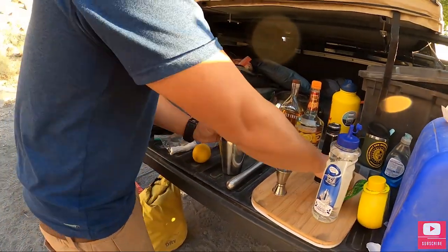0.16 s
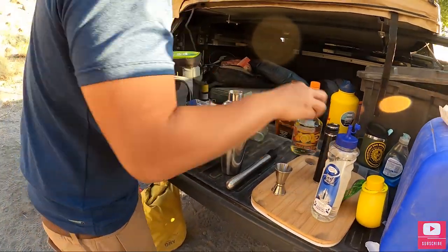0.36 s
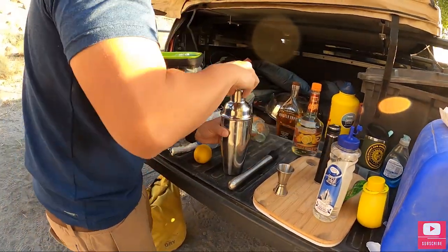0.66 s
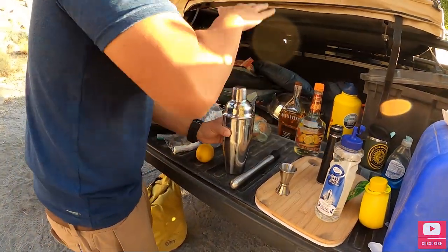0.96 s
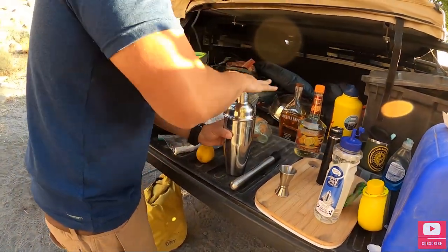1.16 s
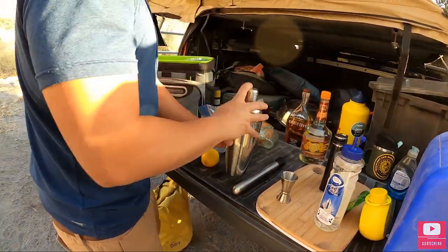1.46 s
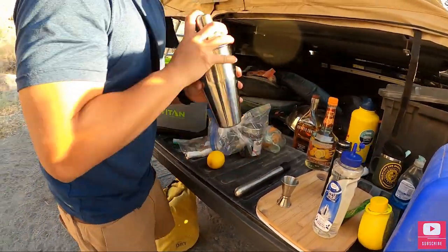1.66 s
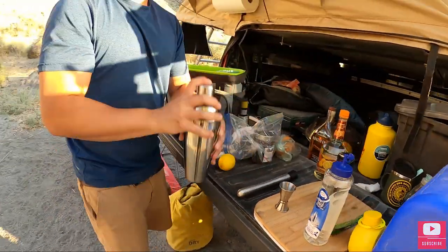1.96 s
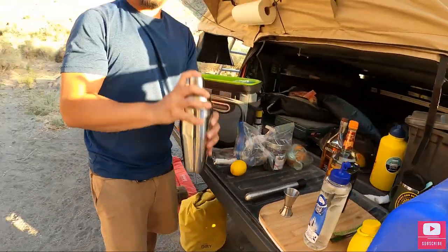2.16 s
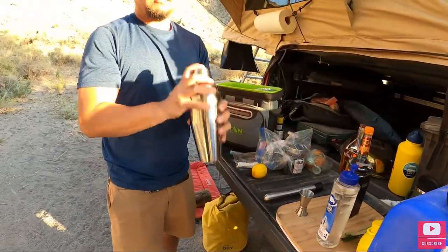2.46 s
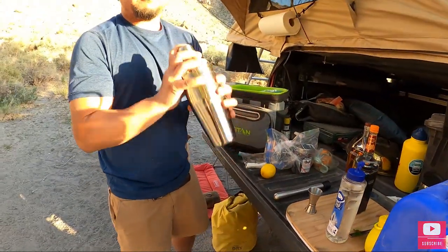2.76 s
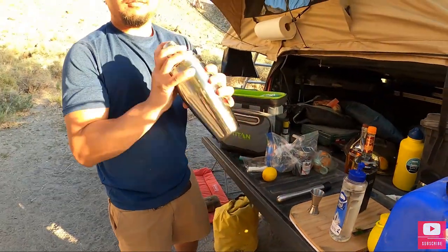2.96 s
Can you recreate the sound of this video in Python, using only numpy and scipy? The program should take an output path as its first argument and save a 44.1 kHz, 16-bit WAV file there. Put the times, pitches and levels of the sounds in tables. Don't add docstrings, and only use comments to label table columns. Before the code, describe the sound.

Steel shaker full of ice: cap clacks on, two palm slaps boom, then brisk rhythmic rattling

```python
import sys
import numpy as np
from scipy import signal
from scipy.fft import rfft, irfft
from scipy.io import wavfile

SR = 44100
rng = np.random.default_rng(int(sys.argv[2]) if len(sys.argv) > 2 else 0)


def ratio_of_db(decibels):
    return 10 ** (np.asarray(decibels, float) / 20)


def generate_wav(signal):
    frames = np.transpose(np.atleast_2d(signal))
    scaled = np.clip(frames, -1, 1) * 32767
    pcm = np.round(scaled).astype(np.int16)
    wavfile.write(sys.argv[1], SR, pcm)


N = 136710

# (frequency [Hz], level [dB], t60 [s])
TIN_MODES = [(760, -11.5, 0.014), (1070, -13.5, 0.0081), (1460, -3, 0.011), (1743, -2, 0.0053),
             (2250, -2, 0.0049), (2900, -1.5, 0.009), (3440, -8, 0.016), (4200, -9.5, 0.00435),
             (5730, -9.5, 0.0069)]


def noise():
    return rng.standard_normal(N)


def rms_one(x):
    return x / np.sqrt(np.mean(x ** 2) + 1e-20)


def band(x, low_hz, high_hz):
    return signal.sosfilt(signal.butter(2, [low_hz, high_hz], "band", fs=SR, output="sos"), x)


def through_tin(x):
    return band(x, 290, 6680)


def ring(clicks, hz, t60):
    radius = ratio_of_db(-60 / (max(t60, 0.002) * SR))
    angle = 2 * np.pi * hz / SR
    poles = [1, -2 * radius * np.cos(angle), radius * radius]
    return signal.lfilter([0, np.sin(angle)], poles, clicks + 1e-18)


def coloured(x, spectrum):
    hz, db = np.transpose(spectrum)
    size = 4096
    bins_hz = np.linspace(1, SR / 2, size // 2 + 1)
    log_gain = np.interp(np.log(bins_hz), np.log(hz), db) * np.log(10) / 20
    cepstrum = irfft(log_gain)
    cepstrum[1:size // 2] *= 2
    cepstrum[size // 2 + 1:] = 0
    response = irfft(np.exp(rfft(cepstrum)))
    return signal.fftconvolve(x, response / np.sqrt(np.sum(response ** 2)))[:N]


def chips(rate, spread_db):
    sizes = ratio_of_db(spread_db * np.minimum(rng.exponential(1, N), 4)) * rng.choice([-1, 1], N)
    return rms_one(sizes * (rng.random(N) < rate / SR))


def decay(start_s, t60):
    t = np.arange(N) / SR - start_s
    return (t >= 0) * ratio_of_db(-60 * np.maximum(t, 0) / t60)


def swell(start, peak, end, db):
    t = np.arange(N) / SR
    shape_db = np.interp(t, [start, peak, end, end + 0.045], [-15.5, 0, -23.5, -70])
    return (t > start) * ratio_of_db(db + shape_db)


def fader(points):
    s, db = np.transpose(points)
    return ratio_of_db(np.interp(np.arange(N) / SR, s, db))


def struck(hits, modes, vary_db=5.0):
    out = np.zeros(N)
    luck = rng.normal(0, 1, (len(hits), len(modes)))
    for k, (hz, db, t60) in enumerate(modes):
        clicks = np.zeros(N)
        for hit, chance in zip(hits, luck[:, k]):
            clicks[int(hit[0] * SR)] = ratio_of_db(hit[1] + db + vary_db * chance)
        out += ring(clicks, hz, t60)
    return out


def knocks(rows, t60, trim_db, crack_s=0.013, top_db=-16.5):
    rings = struck(rows, TIN_MODES) * ratio_of_db(-22)
    crack = np.zeros(N)
    fall = decay(0, crack_s)
    hardest_db = max(row[1] for row in rows)
    for s, db, hz in rows:
        i = int(s * SR)
        piece = ring(np.eye(1, 2000)[0], hz, t60)[:N - i]
        rings[i:i + len(piece)] += ratio_of_db(db) * piece
        crack_db = db - 1 + 0.2 * (db - hardest_db)
        crack[i:i + len(piece)] += ratio_of_db(crack_db) * fall[:len(piece)]
    bright = [(200, -23.5), (2000, 9.5), (5500, 0.0), (9000, top_db), (15000, top_db - 18.5)]
    return ratio_of_db(trim_db) * (through_tin(rings) + coloured(crack * noise(), bright))


def camp_air():
    # (frequency [Hz], level [dB per Hz])
    air_spectrum = [(300, -27.5), (800, -3.5), (1000, -1), (2200, -5), (6000, -24), (15000, -48.5)]
    # (time [s], level [dB])
    air_level = [(0, -57.5), (1.1, -59.5), (1.501, -67), (1.661, -65.5), (1.8, -59), (2.2, -51)]
    rumble = ratio_of_db(-62.5) * rms_one(band(noise(), 110, 305))
    return fader(air_level) * coloured(noise(), air_spectrum) + rumble


def wind():
    # (time [s], level [dB])
    gusts = [(0, -74), (.65, -74), (.8, -57), (1.15, -57), (1.6, -80), (2.3, -76), (2.5, -54), (2.7, -65.5),
             (3.1, -66)]
    return fader(gusts) * rms_one(band(noise(), 25, 120))


def handling():
    # (start [s], peak [s], end [s], level [dB], ring [Hz])
    rubs = [
        (0.251, 0.256, 0.3, -44, 1300),
        (0.275, 0.295, 0.34, -41, 976),
        (1.184, 1.199, 1.203, -32, 1500),
    ]
    # (time [s], level [dB])
    ticks = [
        (.401, -38.5),
        (0.51, -47),
    ]
    # (frequency [Hz], level [dB], t60 [s])
    loose_cap = [(2030, -7, 0.13), (3150, -12, 0.14), (3601, -7, 0.16), (4500, -13.5, .15),
                 (5280, -6, 0.06), (6234, -15, 0.17), (9020, -23, .15), (10200, -14, 0.059)]
    # (time [s], level [dB])
    rim_taps = [(.512, -54)]
    # (frequency [Hz], level [dB], t60 [s])
    rim_modes = [(3410, 3, .04), (5470, 1, 0.031), (6270, -7, 0.023)]
    # (start [s], peak [s], end [s], level [dB], ring [Hz])
    trickle = (1.8, 1.9, 3.2, -54, 2150)
    # (time [s], peak level [dB], ring [Hz])
    shifts = [(1.549, -43, 2190), (1.5559, -37.5, 3430), (1.5813, -42, 2200), (1.603, -46.5, 2120),
              (1.6837, -42, 2200), (1.7474, -35, 2040), (1.77, -46, 2060), (1.7933, -49, 2253)]

    rubbing = np.zeros(N)
    for start, peak, end, db, hz in rubs:
        touch = swell(start, peak, end, db - 16.5) * noise()
        rubbing += ring(touch, hz, 0.024) + ratio_of_db(8.0) * band(touch, 700, 3700)
    dust = sum(ratio_of_db(db - 9) * decay(s, 0.12) for s, db in ticks) * noise()
    ticking = ratio_of_db(-3) * struck(ticks[:1], loose_cap, 0) + struck(rim_taps, rim_modes, 0)
    running = ring(swell(*trickle[:4]) * chips(250, 2.5), trickle[4], 0.029)
    shifting = knocks(shifts, 0.037, -7, crack_s=0.026, top_db=-33.0)
    return rubbing + band(dust, 2300, 7400) + band(ticking, 1000, 11000) + running + shifting


def slaps():
    # (time [s], level [dB], t60 [s], brightness [dB])
    blows = [
        (.958, -22, 0.12, 3.5),
        (1.015, -34, 0.26, 6),
        (1.2, -15, 0.11, 6.5),
        (1.211, -15, 0.095, 8),
        (1.243, -17.5, 0.47, 2.5),
        (.741, -41, 0.43, -3.5),
        (.408, -45, 0.39, -17.5),
        (1.36, -43.5, 0.18, -16),
    ]
    # (frequency [Hz], level [dB per Hz])
    thud_spectrum = [(45, -43), (95, -4.5), (270, -1.5), (450, -8.5), (650, -13.5), (2000, -21.5),
                     (6000, -48), (15000, -89)]
    # (frequency [Hz], level [dB], t60 [s])
    tailgate = [(115, -10.5, 0.05), (171, -3, 0.13), (204, -5.5, 0.11), (268, -1.5, 0.1), (411.7, -6, 0.11)]

    heavy = sum(ratio_of_db(db) * decay(s, t60) for s, db, t60, _ in blows) * noise()
    light = sum(ratio_of_db(db + tilt_db) * decay(s, t60 * 0.84) for s, db, t60, tilt_db in blows) * noise()
    low, high = (signal.butter(2, 433, kind, fs=SR) for kind in ("low", "high"))
    thud = coloured(signal.lfilter(*low, heavy) + signal.lfilter(*high, light), thud_spectrum)
    boom = sum(ratio_of_db(db) * ring(heavy, hz, t60) for hz, db, t60 in tailgate)
    boom += ratio_of_db(30) * struck(blows, tailgate, 4.43)
    return thud + ratio_of_db(-30.5) * band(boom, 80, 1100)


def cap():
    # (time [s], peak level [dB])
    cap_hits = [
        (.645, -44),
        (0.657, -35),
        (.667, -4.5),
        (0.6782, -2),
        (0.698, -17),
        (0.735, -31),
    ]
    # (frequency [Hz], level [dB], t60 [s])
    cap_modes = [(253, -13, 0.069), (1470, -13.5, 0.06), (2093, -6, 0.045), (2420, -6, 0.048),
                 (2900, -1.5, .05), (3400, -9, 0.054), (3710, -8.5, 0.052), (4440, -17.5, 0.056),
                 (5150, -11, 0.061), (5530, -6.5, 0.053), (7780, -25, .04), (9870, -29.5, .13)]
    # (frequency [Hz], level [dB per Hz])
    scrape_spectrum = [(150, -35), (900, -20.5), (1500, -6.5), (5500, -11), (7000, -29), (12000, -28.5),
                       (15000, -59.5)]
    grind_from_s, grind_to_s = 0.69, 0.748

    grinding = np.arange(N) < grind_to_s * SR
    scrape = ratio_of_db(-37.5) * decay(grind_from_s, 0.34) * grinding
    scrape = scrape + sum(ratio_of_db(db - 18) * decay(s, 0.055) for s, db in cap_hits)
    stirred = sum(ratio_of_db(db - 18) * ring(scrape * noise(), hz, t60) for hz, db, t60 in cap_modes)
    rings = struck(cap_hits, cap_modes, 2.5) + stirred
    rings = band(band(rings, 180, 12000), 130, 13000)
    damping = np.minimum(grinding + decay(grind_to_s, 0.07), 1)
    return ratio_of_db(-9) * rings * damping + ratio_of_db(-3.0) * coloured(scrape * noise(), scrape_spectrum)


def rattle():
    # (time [s], peak level [dB], ring [Hz])
    rattles = [(1.016, -23, 1250), (1.2005, -10, 1330), (1.2155, -12, 2200), (1.2431, -10, 3200),
               (1.2574, -16.5, 4740), (1.273, -18, 2900), (1.297, -15, 2280), (1.3387, -22.5, 3130),
               (1.3443, -20, 2570), (1.3565, -15, 2720), (1.3685, -20, 2900), (1.373, -19, 4900),
               (1.384, -25, 4560), (1.4003, -27, 2420), (1.4243, -36.5, 1480)]
    # (time [s], level [dB])
    clinks = [
        (1.309, -43),
        (1.343, -51),
    ]
    # (frequency [Hz], level [dB], t60 [s])
    bottles = [(6481, -4, 0.13), (10260, 3, 0.21), (10920, -12, 0.35), (11700, -11, 0.15),
               (12300, -10, .15), (13080, -22, .3), (13730, -18, .2), (14430, -24, .2), (15200, -20, .15)]
    # (frequency [Hz], level [dB], t60 [s])
    first_clink = [(10300, -58, .2), (10920, -55.5, 0.44), (13080, -63, .3), (15200, -66, .12)]

    board = [(300, -10.5), (900, 3.5), (3000, 2.0), (7000, -17.0), (15000, -47)]
    patter = coloured(chips(1400, 3.6) * ratio_of_db(-26) * decay(1.2, 0.45), board)
    hops = knocks(rattles, 0.022, -10.0, crack_s=0.027, top_db=-30.5)
    ping = struck([(1.36, -60)], [(8260, 0, 0.25)], 0)
    bonk = band(struck([(1.016, -28)], [(450, 0, 0.1)], 0), 250, 900)
    glass = struck(clinks, bottles, 0) + struck([(1.248, 0)], first_clink, 0)
    return patter + hops + ping + bonk + band(glass, 5800, 18000)


def throws():
    # (start [s], peak [s], end [s], level [dB], air ring [Hz])
    load_throws = [(1.836, 1.863, 1.89, -25, 2550), (1.876, 1.922, 1.966, -20.5, 2520),
                   (2.006, 2.033, 2.08, -24.5, 2900), (2.088, 2.139, 2.174, -21, 2880),
                   (2.212, 2.255, 2.28, -23, 3070), (2.285, 2.362, 2.385, -26.5, 1620),
                   (2.434, 2.481, 2.59, -25, 2900), (2.529, 2.572, 2.622, -23.5, 1720),
                   (2.667, 2.699, 2.76, -23, 2900), (2.743, 2.789, 2.805, -21.5, 1450),
                   (2.793, 2.831, 2.84, -34, 1500), (2.875, 2.918, 2.96, -22, 2900),
                   (2.952, 3.006, 3.062, -22.5, 1440), (3.08, 3.098, 3.1, -28.5, 2900)]
    # (frequency [Hz], level [dB per Hz])
    slosh_spectrum = [(100, -35), (320, -18), (1200, -4), (2900, -2.5), (9000, -24.5), (12500, -33.5),
                      (15000, -70)]

    grains = chips(1100, 2.25)
    rings = np.zeros(N)
    level = ratio_of_db(-56.5) * (np.arange(N) > 1.79 * SR)
    for start, peak, end, db, hz in load_throws:
        shape = swell(start, peak, end, db)
        level = level + shape
        rings += ratio_of_db(-20) * ring(grains * shape, hz, 0.015)
    for hz, db, t60 in TIN_MODES:
        rings += ratio_of_db(db - 21) * ring(grains * level * noise(), hz, t60)
    spray = signal.lfilter([1], [1, -0.985], np.abs(grains)) * noise()
    slosh = level * (ratio_of_db(-8) * chips(4000, 6.7) + ratio_of_db(-30.5) * spray)
    return through_tin(rings) + coloured(slosh, slosh_spectrum)


def ice_cubes():
    # (time [s], peak level [dB], ring [Hz])
    cube_hits = [(1.8171, -26.5, 2390), (1.8403, -10, 2000), (1.8519, -10.5, 2600), (1.8607, -10.5, 2600),
                 (1.8668, -6.5, 2570), (1.8841, -14, 2520), (1.915, -10.5, 2490), (2.01, -17, 1470),
                 (2.0198, -13.5, 3120), (2.03, -8, 2810), (2.036, -4.5, 2940), (2.0734, -18.5, 1430),
                 (2.0997, -14.5, 2940), (2.1313, -11.5, 2810), (2.196, -27.5, 1470), (2.2124, -17, 1480),
                 (2.2323, -14, 2970), (2.237, -6, 3070), (2.2501, -17.5, 1620), (2.3217, -15.5, 1420),
                 (2.3435, -11, 1800),
                 (2.4442, -13.5, 2900), (2.4575, -7, 2900), (2.476, -6.5, 1560), (2.4843, -8.5, 2790),
                   (2.5661, -10.5, 2940), (2.594, -14, 1260), (2.6793, -11.5, 2747), (2.6944, -8, 2920),
                   (2.7114, -11, 1640), (2.7822, -16, 1460), (2.8808, -11, 1520), (2.8926, -6.5, 2910),
                   (2.9103, -9.5, 2070), (2.9941, -8, 960), (3.0832, -21.5, 1560),
                 (1.895, -9, 2480), (1.925, -13.5, 2440), (1.939, -17, 2480), (1.993, -26, 1470),
                   (2.116, -20, 2670), (2.125, -10.5, 2820), (2.136, -12, 2030), (2.217, -12.5, 2820),
                   (2.243, -10, 3130), (2.257, -15, 1570), (2.296, -17.5, 2880), (2.311, -20, 2600),
                   (2.334, -10.5, 1740), (2.356, -15, 1970), (2.394, -28.5, 1360), (2.414, -30.5, 2200),
                   (2.538, -22.5, 1380), (2.571, -12, 2850), (2.666, -26, 2080), (2.673, -10.5, 2920),
                   (2.734, -22, 1360), (2.75, -19, 1750), (2.774, -10, 1470), (2.821, -25, 1569),
                   (2.84, -24.5, 3090), (2.924, -11.5, 2120), (2.957, -17, 1740), (2.98, -10.5, 2440),
                   (3.033, -22.5, 2880), (3.047, -21.5, 2961)]
    return knocks(cube_hits, 0.018, -6)


def scene():
    mid = camp_air() + wind() + handling() + slaps() + cap() + rattle() + throws() + ice_cubes()
    top = signal.sosfilt(signal.butter(4, 11570, "high", fs=SR, output="sos"), mid)
    side = ratio_of_db(-5.5) * np.roll(top, 40)
    side += ratio_of_db(-28.5) * band(np.roll(mid, 9), 4500, 10000)
    side += ratio_of_db(-44.5) * np.roll(mid, 30)
    return np.array([mid + side, mid - side])


def roll_off(x):
    return signal.sosfilt(signal.butter(12, 15720, fs=SR, output="sos"), x)


def record(dry):
    soft = 2 * np.tanh(dry / 2)
    mix = signal.sosfilt(signal.cheby2(10, 60, 15750, fs=SR, output="sos"), soft)
    return roll_off(mix)


dry = scene()
out = record(dry)
generate_wav(out)
```